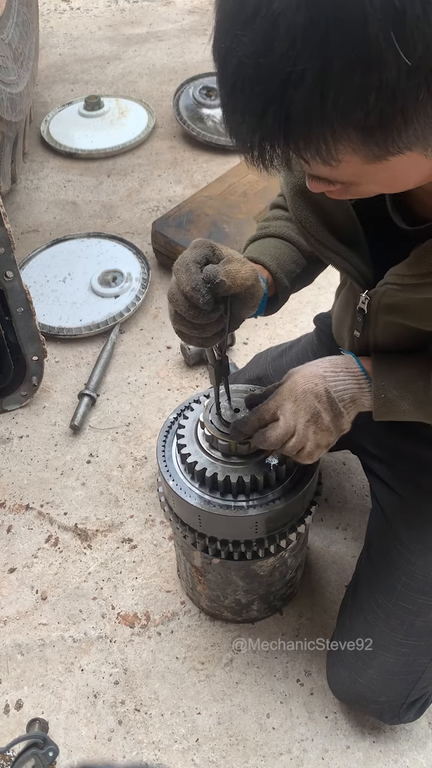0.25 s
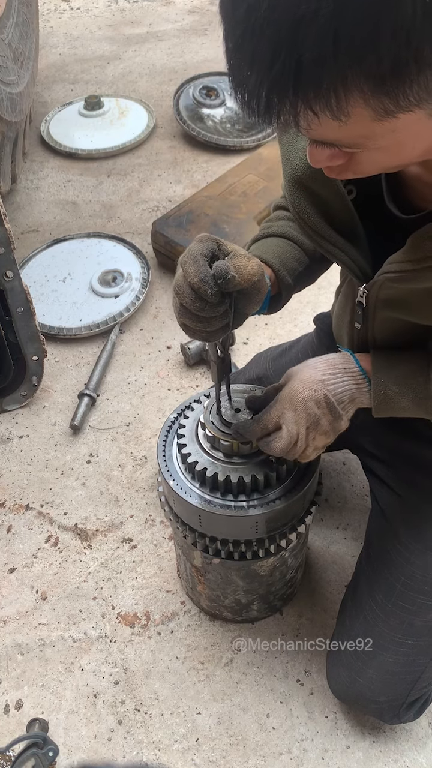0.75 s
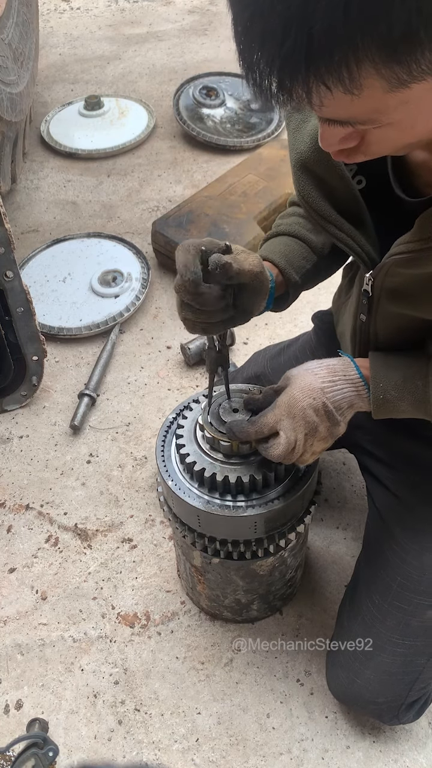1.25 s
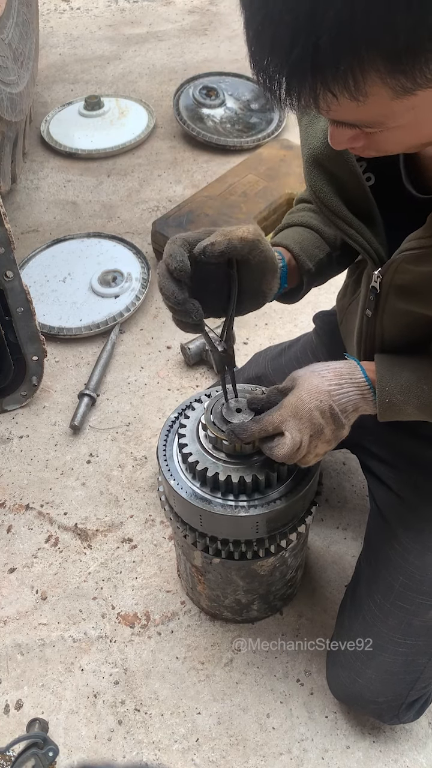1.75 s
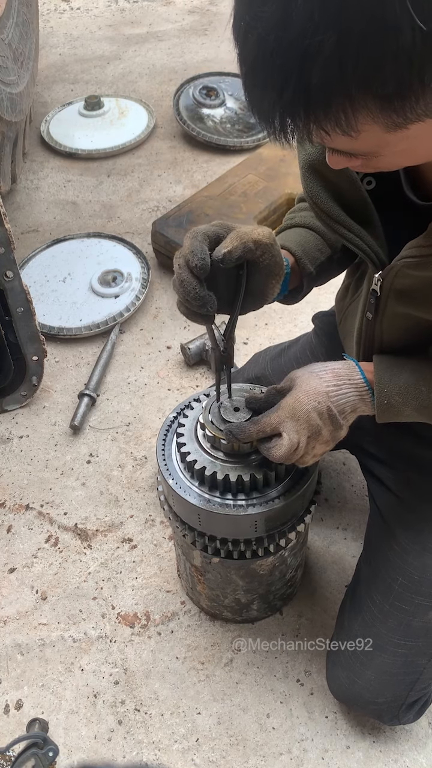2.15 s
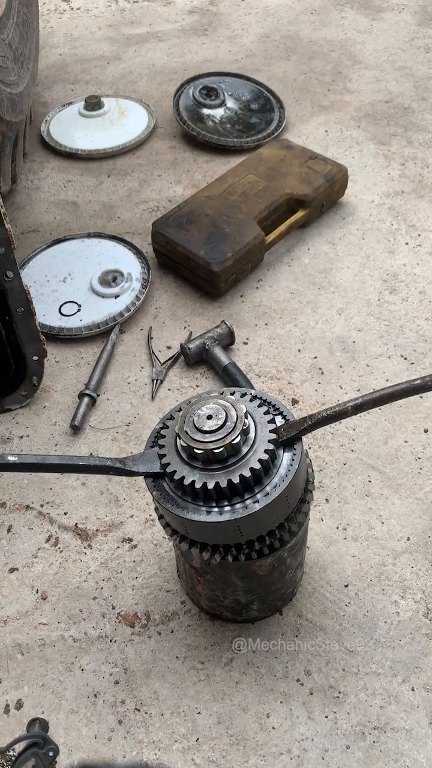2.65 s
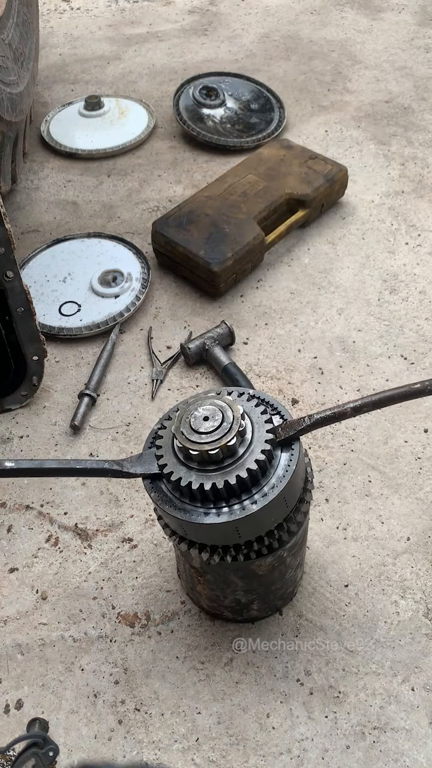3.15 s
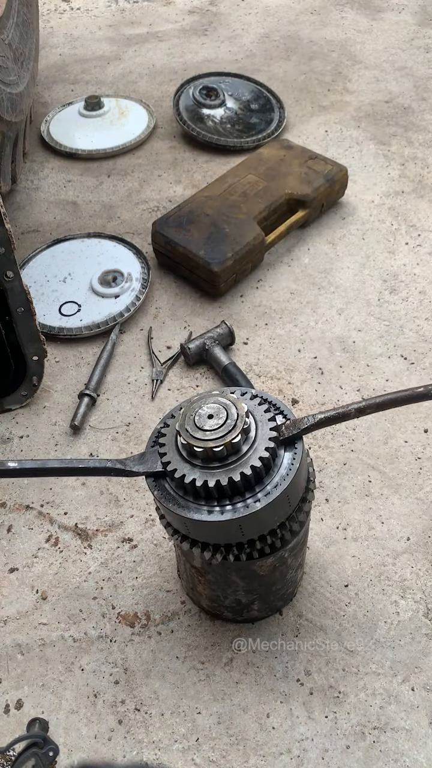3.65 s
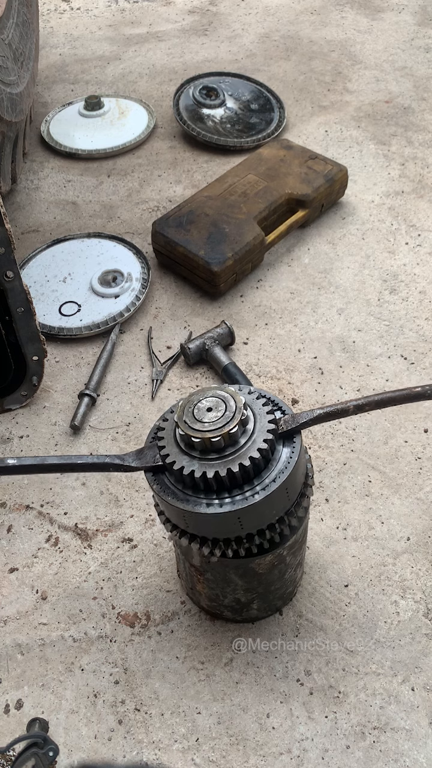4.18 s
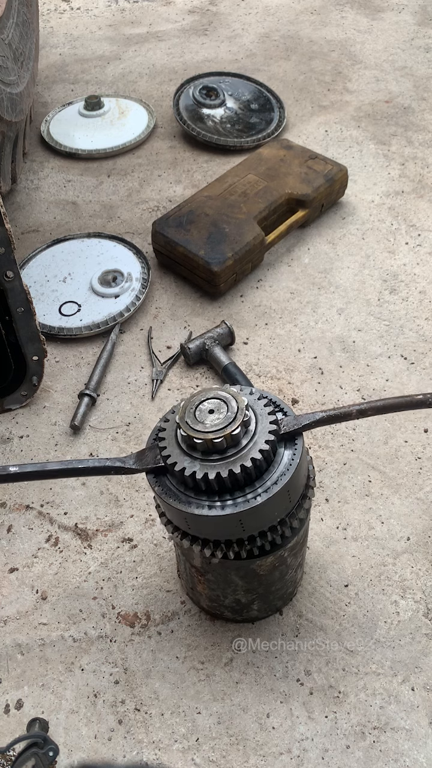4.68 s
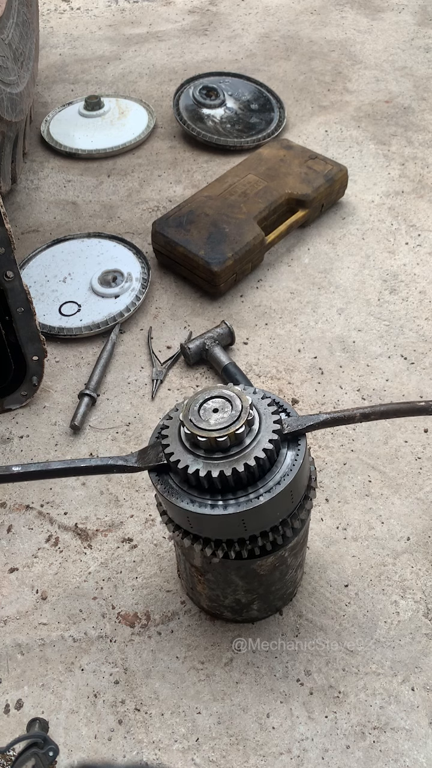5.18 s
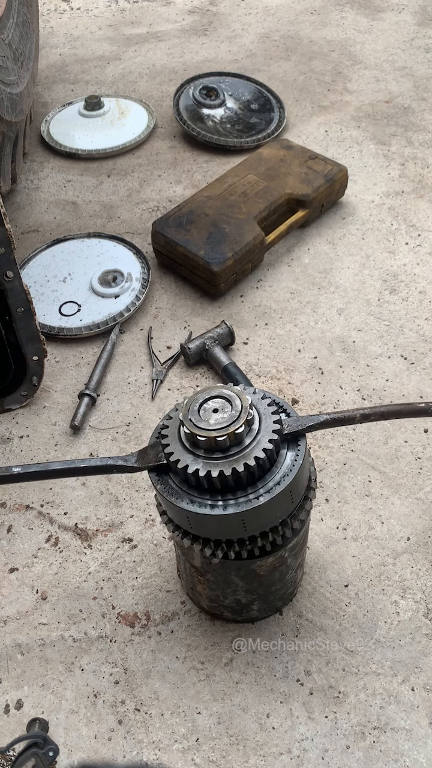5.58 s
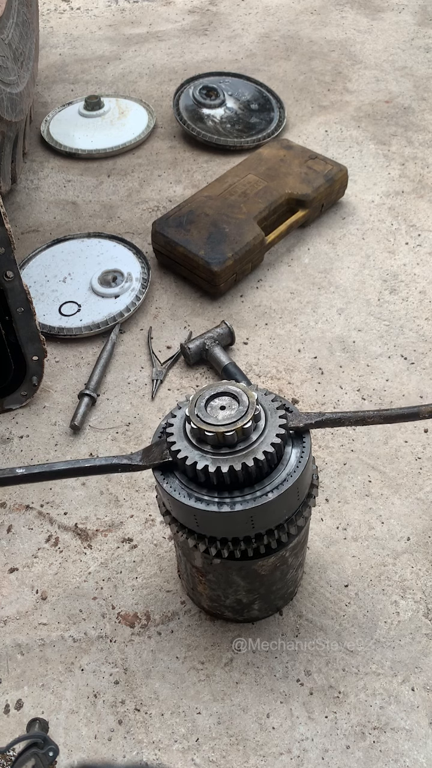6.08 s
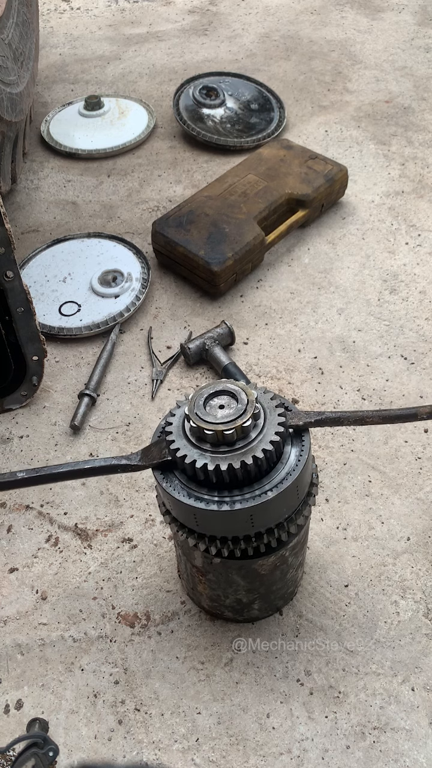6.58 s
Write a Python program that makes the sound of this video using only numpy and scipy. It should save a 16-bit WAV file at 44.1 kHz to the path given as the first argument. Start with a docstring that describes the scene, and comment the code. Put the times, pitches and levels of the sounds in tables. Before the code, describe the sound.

In a hard, reverberant workshop, a spring clip cracks free; after near-silence, heavy bars clank against gears about twice a second, bouncing and rattling.

```python
"""In a hard, echoing workshop, cloth rubs, then a circlip scrapes and snaps off its shaft: noise and a tone.
Light touches of steel follow; then two bars heave at a gear stack, which knocks and bounces about twice
a second: noise ticks, decaying modes and rattling noise. The level dips briefly just before a bar slides
in with a faint groan. Walls and hall echo every sound over a low rumble. Gain control ducks sounds that
leap out of quiet, so that their echoes swell up afterwards."""
import sys
import numpy as np
from scipy import signal
from scipy.fft import rfft, irfft, next_fast_len
from scipy.io import wavfile
from scipy.ndimage import uniform_filter1d, minimum_filter1d

SR = 44100
rng = np.random.default_rng(int(sys.argv[2]) if len(sys.argv) > 2 else 0)


def to_wav(s):
    """Save 16-bit WAV."""
    ch = np.atleast_2d(s).T  # columns
    pcm = np.round(np.clip(ch, -1, 1) * 32767)  # PCM
    wavfile.write(sys.argv[1], SR, pcm.astype(np.int16))


N = 301182

# Heaves of the bars on the gear. Each row: start in seconds, force in dB, hardness of the contact in dB,
# pitch of the bar in Hz (scattered slightly at each blow).
HEAVES = [(2.8603, -3, 3.5, 2410), (3.535, -11, -1.5, 2332), (4.0437, -12.5, -1, 1777),
          (4.5595, -13.5, -1, 1736), (5.0806, -13, -2.5, 1836), (5.6012, -15, -2.5, 1886),
          (6.017, -7, -0.5, 1630), (6.5621, -11, -1.5, 1933)]
# The gear drops back and bounces. Each row: start in seconds, force relative to the last heave in dB.
REBOUNDS = [(3.025, -25.5), (3.621, -2), (4.0984, -5), (4.1359, -5.5), (4.188, -5), (4.5892, -5.5),
            (4.618, -5), (4.6401, -10.5), (4.6594, -6), (4.687, -6), (5.1166, -8), (5.1496, -8),
            (5.1895, -12.5), (5.6508, -9), (6.0622, -11.5), (6.0995, -8), (6.604, -5.5)]
# The heavy stack on its stand. Each row: multiple of the thud pitch, relative level in dB, t60 in seconds.
STACK_MODES = [(.3, -30.5, 0.06), (0.679, -25.5, 0.056), (0.892, -9, 0.072), (0.987, 5, 0.04),
               (1.202, -2, .04), (1.38, -15, 0.033)]
# The bars and gear rim. Each row: mean pitch in Hz, relative level in dB, t60 in seconds.
STEEL_MODES = [(1001, -1, 0.048), (1122.5, -1.5, 0.062), (1234.6, 15, 0.02), (1323, 3, 0.027),
               (2350, -18, 0.01), (3360, -25, 0.155), (3900, -2, 0.031), (4356, 12.5, 0.01),
               (4600, -23.5, 0.01), (5700, 6, 0.004), (5270, -5, 0.034)]
# The struck tooth as the bars work round the gear. Each row: time in seconds, extra level in dB, pitch in Hz.
TOOTH_PATH = [(2.86, 7, 6460), (3.58, 10, 6450), (4.039, 1, 6130), (4.13, 20, 6040), (4.2, 7.5, 6200),
              (4.56, 7.5, 5850), (5.1, -1, 5700), (5.599, -4, 5620), (6.02, 5.5, 6040), (6.56, -6, 6480)]
# Partials of a tooth. Each row: multiple of the tooth pitch, relative level in dB, t60 in seconds.
TOOTH_MODES = [(.91, -11, 0.014), (1, 6, 0.0058), (1.09, -9.5, .005)]
# Spectra of the contact tick and of the loose parts. Each row: frequency in Hz, relative level in dB per Hz.
TICK_SPECTRUM = [(800, -16.5), (2000, -17), (3000, 12.5), (4500, 19.5), (7500, 20), (9000, 17.5),
                 (12500, 13.5), (16000, 13.5)]
RATTLE_SPECTRUM = [(220, -12), (350, 5), (700, 10.5), (830, 0.5), (1000, 3.5), (1300, 1.5), (2200, 0),
                   (2900, -9.5), (4200, -7), (7000, -16.5), (12000, -22.5), (16000, -56.5)]
# The circlip snapping off, then light touches of steel. Each row: start in seconds, level in dB.
SNAPS = [(0.9936, -7), (.9962, -9), (1.0, -12), (1.4595, -39), (1.6902, -50.5), (1.8486, -50.5),
         (2.1316, -60), (2.399, -59), (2.6845, -64), (2.8232, -58.5), (4.019, -47), (5.7572, -59)]
# Spectrum of the circlip. Each row: frequency in Hz, relative level in dB per Hz.
CLIP_SPECTRUM = [(1000, -12.5), (1700, -14), (2150, -7.5), (2900, -20), (4000, -4.5), (6300, 7),
                 (8000, 8.5), (12500, -1), (16000, 0)]
# Soft rubs of gloves and sleeves, and the circlip's scrape before it snaps.
# Each row: start in seconds, length in seconds, body in dB, hiss in dB.
RUBS = [(0.044, 0.79, -65.5, -77.5), (0.733, 0.083, -45, -58), (0.765, 0.15, -46.5, -64.5),
        (0.978, 0.046, -63, -39), (1.496, 0.33, -67.5, -62), (1.86, .16, -67, -77), (5.817, 0.35, -54, -59)]
# Spectra of the body and hiss of a rub. Each row: frequency in Hz, relative level in dB per Hz.
RUB_BODY_SPECTRUM = [(60, -32.5), (200, 10), (350, 8), (700, -5), (1500, -6.5), (3500, -12.5), (8000, -39)]
RUB_HISS_SPECTRUM = [(1000, -4), (3500, 1.5), (7500, 9.5), (12500, -2.5), (16000, 2.5)]
# Soft bumps as tools are set and the stack rocks. Each row: start in seconds, level in dB, pitch in Hz.
BUMPS = [(.72, -42, 200), (1.545, -47, 340), (1.92, -54, 350), (2.772, -33, 150), (2.775, -28, 270),
         (2.838, -39, 560), (2.852, -32, 560), (2.863, -14, 215)]
# Early echoes from the near walls. Each row: delay in seconds, level in dB.
WALLS = [(.0085, -12.5), (0.0264, -18.5), (0.0311, -16.5), (.047, -19)]
# Initial spectrum of the hall's echo. Each row: frequency in Hz, relative level in dB per Hz.
HALL_SPECTRUM = [(40, -10.5), (88, 4), (130, 12), (250, 4.5), (480, -5), (620, -1.5), (900, -7.5),
                 (1800, -2.5), (4000, -1.5), (7000, -11.5), (13000, -0.5)]
# Decay of the hall's echo. Each row: frequency in Hz, t60 in seconds.
HALL_DECAY = [(80, 0.22), (500, 1.48), (1200, 1.96), (4000, 1.59), (7000, 1.35), (13000, 0.41)]
# Spectrum of the hall's still air. Each row: frequency in Hz, relative level in dB per Hz.
AIR_SPECTRUM = [(15, -49.5), (25, -31), (39, -4.5), (70, -3.5), (270, -25), (301, -18), (384, -27),
                (476, -27), (1840, -37.5), (2760, -50), (6380, -48), (16000, -59.5)]
# Likeness of left and right in diffuse sound. Each row: frequency in Hz, correlation from -1 to 1.
ALIKE = [(60, 1), (290, 0.78), (640, 0.58), (1400, 0.28), (3100, 0.21), (7000, -0.16), (15000, -0.54)]
# Phase by which the left microphone leads. Each row: frequency in Hz, lead in radians.
LEAD = [(100, 0), (250, -.4), (480, .05), (800, -.4), (1200, -.7), (2300, 1), (3800, 1.4), (4900, 3.1),
        (6600, 6.3), (9700, 9.4), (12000, 12.6), (15000, 15.7)]
# Microphone response. Each row: frequency in Hz, gain in dB.
MIC = [(25, -18), (55, -4.5), (8300, 0.5), (9300, -6.5), (9800, -27), (10400, 0), (11500, 2.5),
       (13700, 0.5), (14800, -7.5), (16500, -20)]

# parts of a blow relative to its force (dB); a contact's hardness is added to clang and tick
CLANG_DB, TICK_DB, TOOTH_DB, BOOM_DB = -9.5, -13, -20.5, -14
# softer contacts are duller: dB lost by each part for every dB that a rebound is weaker
CLANG_LOSS, TICK_LOSS, TOOTH_LOSS = 1.3, 2.04, 1.56
# the stack rings a little higher when pressed harder: pitch at 0 dB of force, and its rise
THUD_HZ, THUD_RISE_HZ_PER_DB = 536.7, 3.5
# the stack starts to move just after the contact
SWELL_S, THUD_DELAY_S = 0.00224, 0.00087
# harder contacts favour upper modes (dB per octave for each dB of hardness); random spread of a mode (dB)
THUD_TILT_DB, THUD_SCATTER_DB = 2, -0.7
# the contact tick at a heave; a rebound weaker by TICK_HALVES_DB is half as long
TICK_RISE_S, TICK_T60_S, TICK_HALVES_DB = 0.00074, 0.022, 15
# loose parts after a 0 dB heave; a heave weaker by RATTLE_DOUBLES_DB shakes them half as long
RATTLE_T60_S, RATTLE_DOUBLES_DB = .16, 14.5
# the circlip's own tone, and its brief chatter against the pliers
SING_HZ, SING_DB, SING_T60_S = 2130, -8, .06
CHATTER_DB, CHATTER_T60_S = -17, 0.035
TOP_HZ = 16600  # upper band limit


def amp(db):
    """An amplitude ratio is ten to the power of its level over 20."""
    return 10 ** (np.asarray(db) / 20)


def unit(x, size=None):
    """Scaling by the rms of the first size samples makes that rms 1."""
    return x / np.sqrt(np.mean(x[..., :size] ** 2) + 1e-20)


def along(points, hz):
    """Values between (Hz, value) points are interpolated on a logarithmic frequency axis."""
    f, v = np.transpose(points)
    return np.interp(np.log(hz + 1), np.log(f + 1), v)


def filtered(x, response):
    """A linear filter multiplies the spectrum by its frequency response."""
    n = x.shape[-1]
    m = next_fast_len(n + 8192)
    return irfft(rfft(x, m) * response(np.fft.rfftfreq(m, 1 / SR)), m)[..., :n]


def noise(spectrum, shape):
    """White noise shaped by a spectrum becomes coloured noise, here of rms 1."""
    return unit(filtered(rng.standard_normal(shape), lambda hz: amp(along(spectrum, hz))))


def diffuse(spectrum, n):
    """Sound from all around is alike at two points in the bass and ever less alike in the treble."""
    def mid_and_side(hz):
        # the cosine of twice the angle is the left-right correlation
        angle = np.arccos(np.clip(along(ALIKE, hz), -1, 1)) / 2
        return np.array([np.cos(angle), np.sin(angle)])

    mid, side = filtered(noise(spectrum, (2, n)), mid_and_side)
    return unit(np.array([mid + side, mid - side]))


def add(track, s, x):
    """Sounds superpose: x is summed into the track from time s."""
    part = track[:, round(s * SR):][:, :x.shape[-1]]
    part += x[..., :part.shape[1]]


def fade(t, t60, attack):
    """A damped vibration rises quickly and decays exponentially, by 60 dB in each t60."""
    return amp(-60 * t / t60) * (1 - np.exp(-t / attack))


def ring(modes, t, scatter_db, detune, channels=1):
    """A body struck at a new place gives its modes new strengths and phases, and slightly new pitches."""
    hz, db, t60 = np.transpose(modes)[:, :, None]
    hz = hz * (1 + detune * rng.standard_normal(hz.shape))
    shape = (channels, len(modes), 1)
    size = amp(db + scatter_db * rng.standard_normal(shape))
    wave = np.sin(2 * np.pi * (hz * t + rng.random(shape)))
    return np.sum(size * wave * fade(t, t60, attack=0.0021), axis=1)


def blows():
    """A rebound shares its heave's contact: rows of (s, force dB, drop dB, hardness dB, bar Hz)."""
    rows = [(s, force_db, 0, hard_db, bar_hz) for s, force_db, hard_db, bar_hz in HEAVES]
    for s, drop_db in REBOUNDS:
        _, force_db, hard_db, bar_hz = [heave for heave in HEAVES if heave[0] < s][-1]
        rows.append((s, force_db, drop_db, hard_db, bar_hz))
    return rows


def contact_tick(t, drop_db):
    """Impact noise lasts as long as the contact; here weaker rebounds are briefer, over a faint tail."""
    brief = 2 ** (drop_db / TICK_HALVES_DB)
    contact = fade(t, TICK_T60_S * brief, TICK_RISE_S * brief)
    tail = amp(-24.5) * fade(t, t60=0.28, attack=.003)
    return unit(noise(TICK_SPECTRUM, len(t)) * (contact + tail), size=180)


def tooth_ring(t, tooth_hz):
    """A small stiff tooth rings high, as a few heavily damped partials lasting milliseconds."""
    partials = [amp(db) * np.sin(2 * np.pi * multiple * tooth_hz * t) * fade(t, t60, attack=0.00046)
                for multiple, db, t60 in TOOTH_MODES]
    return unit(sum(partials), size=180)


def low_boom(t):
    """A slow low mode booms under each blow."""
    boom_hz = 87 * (1 + 0.027 * rng.standard_normal())
    return np.sin(2 * np.pi * boom_hz * t) * fade(t, t60=0.26, attack=0.02)


def stack_thud(t, force_db, hard_db):
    """Inertia delays the heavy stack; its damped modes ring higher with force, brighter with hardness."""
    thud_hz = THUD_HZ + THUD_RISE_HZ_PER_DB * force_db
    thud = 0
    for multiple, db, t60 in STACK_MODES:
        tilt_db = THUD_TILT_DB * hard_db * np.log2(multiple)
        level_db = db + tilt_db + THUD_SCATTER_DB * rng.standard_normal()
        thud += amp(level_db - 60 * t / t60) * np.sin(2 * np.pi * multiple * thud_hz * (t - SWELL_S))
    swell = 1 - np.exp(-(t / SWELL_S) ** 2)
    return unit(swell * thud, size=450)


def bar_clang(t, clang_db, force_db, bar_hz):
    """Struck steel rings in modes; the stronger the clang, the more of it is clatter of loose parts."""
    loose = np.clip(.6 + .025 * (clang_db + 26), .3, .98)  # share of the power
    modes = [*STEEL_MODES, (bar_hz, 0, .05)]
    steel = unit(ring(modes, t, scatter_db=8.0, detune=0.014, channels=2), size=500)
    shake_s = RATTLE_T60_S * 2 ** (force_db / RATTLE_DOUBLES_DB)
    rattle = unit(diffuse(RATTLE_SPECTRUM, len(t)) * fade(t, shake_s, attack=0.000043), size=500)
    clang = np.sqrt(1 - loose) * steel + np.sqrt(loose) * rattle
    return amp(clang_db) * clang * amp([[-2.3], [2.3]])


def bars():
    """An impact excites light parts first: tick and tooth, then a low boom, the stack and the clanging bars."""
    knocks, clangs = np.zeros((2, N)), np.zeros((2, N))
    t = np.arange(SR // 4) / SR
    tooth_s, tooth_extra_db, tooth_pitch = np.transpose(TOOTH_PATH)
    for s, force_db, drop_db, hard_db, bar_hz in blows():
        thud_db = force_db + drop_db
        clang_db = force_db + hard_db + CLANG_DB + CLANG_LOSS * drop_db
        tick_db = force_db + hard_db + TICK_DB + TICK_LOSS * drop_db
        extra_db = np.interp(s, tooth_s, tooth_extra_db)
        tooth_db = force_db + extra_db + TOOTH_DB + TOOTH_LOSS * drop_db
        tooth_hz = np.interp(s, tooth_s, tooth_pitch)
        add(knocks, s, amp(tick_db) * contact_tick(t, drop_db))
        add(knocks, s, amp(tooth_db) * tooth_ring(t, tooth_hz))
        add(knocks, s + 0.00057, amp(thud_db + BOOM_DB) * low_boom(t))
        add(knocks, s + THUD_DELAY_S, amp(thud_db) * stack_thud(t, force_db, hard_db))
        add(clangs, s + 0.0011, bar_clang(t, clang_db, force_db, bar_hz))
    return knocks, clangs


def pliers():
    """Released spring steel gives a wideband crack, a chatter and one brief tone; light touches are duller."""
    out, t = np.zeros((2, N)), np.arange(SR // 8) / SR
    for s, db in SNAPS:
        edge_hz = 8000 * 2 ** ((db + 39) / 25)  # treble cut
        grit = filtered(noise(CLIP_SPECTRUM, len(t)), lambda hz: 1 / np.sqrt(1 + (hz / edge_hz) ** 4))
        snap = fade(t, t60=0.0045, attack=0.0001)
        chatter = amp(CHATTER_DB) * fade(t, CHATTER_T60_S, attack=0.0023)
        crack = unit(grit * (snap + chatter), size=130)
        sing = np.sin(2 * np.pi * SING_HZ * t) * fade(t, SING_T60_S, attack=0.00033) * amp([[-6], [3]])
        add(out, s, amp(db) * (crack + amp(SING_DB) * sing))
    return out


def rubs():
    """Friction of cloth or clip is noise whose level follows each stroke and its uneven grip."""
    out = np.zeros((2, N))
    for s, length, body_db, hiss_db in RUBS:
        n = int(length * SR)
        stroke = np.sin(np.pi * np.linspace(0, 1, n) ** 0.39) ** 2
        grip = amp(0.76 * unit(uniform_filter1d(rng.standard_normal(n), size=300)))
        body = amp(body_db) * diffuse(RUB_BODY_SPECTRUM, n)
        hiss = amp(hiss_db) * diffuse(RUB_HISS_SPECTRUM, n)
        add(out, s, stroke * grip * (body + hiss))
    return out


def soft_bumps():
    """A soft contact excites one low damped mode with a little dull noise."""
    out, t = np.zeros((2, N)), np.arange(SR // 8) / SR
    for s, db, hz in BUMPS:
        pad = noise([(60, 3.0), (150, -15.0), (500, -16), (1800, -24.0), (5000, -49)], len(t))
        bump = np.sin(2 * np.pi * hz * t) + .4 * pad
        add(out, s, amp(db) * bump * fade(t, t60=.06, attack=.002))
    return out


def slide(s, length, low_hz, high_hz, db):
    """Sliding friction makes a bar groan: a rising tone, roughened by uneven grip, with some noise."""
    u = np.linspace(0, 1, int(length * SR))
    grip = unit(uniform_filter1d(rng.standard_normal(len(u)), size=500))
    turns = np.cumsum(low_hz + (high_hz - low_hz) * u) / SR
    groan = (1 + .5 * grip) * np.sin(2 * np.pi * turns) + amp(-11.5) * noise(RATTLE_SPECTRUM, len(u))
    out = np.zeros((2, N))
    add(out, s, amp(db) * np.sin(np.pi * u ** 2) * groan)
    return out


def wall_echoes(x):
    """Near walls reflect delayed copies within 50 ms; the clutter along them swallows the treble."""
    def response(hz):
        echoes = sum(amp(db) * np.exp(-2j * np.pi * hz * delay) for delay, db in WALLS)
        return echoes / (1 + 1j * hz / 2200) ** 2

    return filtered(x, response)


def hall_tail():
    """Dense late reflections are diffuse noise whose every frequency band decays at its own rate."""
    hz, t, z = signal.stft(diffuse(HALL_SPECTRUM, 3 * SR // 2), SR, nperseg=256)
    decay = fade(t, along(HALL_DECAY, hz)[:, None], attack=0.0013)
    tail = signal.istft(z * decay, SR, nperseg=256)[1]
    return tail / np.linalg.norm(tail[0])


def hall(x):
    """Reverberation is convolution with a tail; every blow radiates differently, so each has its own."""
    out = np.zeros((2, N))
    starts = np.sort(np.array(blows())[:, 0]) - .002
    edges = [0, *(starts * SR).astype(int), N]
    for a, b in zip(edges, edges[1:]):
        add(out, a / SR, signal.fftconvolve(x.mean(0)[None, a:b], hall_tail(), axes=1))
    return amp(-16.5) * out * amp([[-.7], [.7]])


def still_air():
    """The hall's low rumble is steady diffuse noise."""
    return amp(-54.0) * diffuse(AIR_SPECTRUM, N)


def scene():
    """Direct sound reaches two microphones slightly out of step; reflections and rumble superpose."""
    knocks, clangs = bars()
    groan = slide(s=5.85, length=.11, low_hz=170, high_hz=390, db=-43)
    work = knocks + clangs + pliers() + rubs() + soft_bumps() + groan
    # only the right channel is turned in phase
    direct = filtered(work, lambda hz: np.exp(1j * along(LEAD, hz) * np.array([[0], [-1]])))
    # the long bars throw their lower ring sideways, into the hall
    sideways_db = [(600, -14), (1150, 12.5), (1600, -19.0), (4000, -54.5)]
    sideways = filtered(clangs, lambda hz: amp(along(sideways_db, hz)))
    into_room = work + sideways
    return direct + hall(into_room) + wall_echoes(into_room) + still_air()


def gain_control(x, jump_db, depth_db, hold, release):
    """A level far above its running mean of about a second lowers the gain, which holds, then recovers."""
    power = np.mean(x ** 2, axis=0)
    now = np.abs(uniform_filter1d(power, size=130))
    earlier = np.pad(power, (SR // 20, 0))[:N]  # 50 ms late
    past = signal.lfilter([1 / SR], [1, 1 / SR - 1], earlier) + amp(-55) ** 2
    excess_db = 10 * np.log10(now / past + 1e-9) - jump_db
    need = -np.clip(excess_db, 0, depth_db)
    h, r = int(hold * SR), int(release * SR)
    # the lowest gain is held, looking 90 samples ahead
    held = minimum_filter1d(np.pad(need, (h, 0)), h)[h // 2 + 90:][:N]
    recovering = signal.fftconvolve(held, np.ones(r) / r)[:N]
    return x * amp(np.minimum(held, recovering))


def record(dry):
    """A recording chain is gain control, microphone response, a brief dip, soft clipping and a band limit."""
    x = gain_control(dry, jump_db=22, depth_db=12.5, hold=0.1, release=0.11)
    x = filtered(x, lambda hz: amp(along(MIC, hz)))
    # the level dips briefly just before the groan
    dip_db = np.interp(np.arange(N) / SR, [5.783, 5.795, 5.812, 5.84], [-0.5, -35, -25.0, -2.5])
    x = x * amp(dip_db)
    x = x / (1 + np.abs(x / .48) ** 8) ** (1 / 8)  # peaks stay below 0.48
    return filtered(x, lambda hz: 1 / (1 + (hz / TOP_HZ) ** 100))


dry = scene()
out = record(dry)
to_wav(out)
```